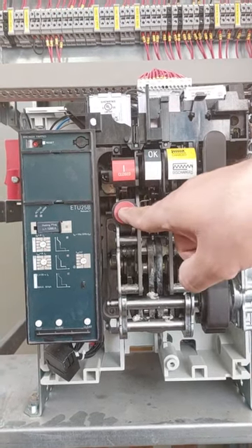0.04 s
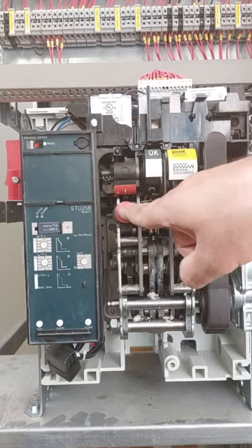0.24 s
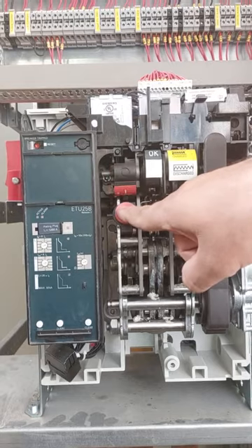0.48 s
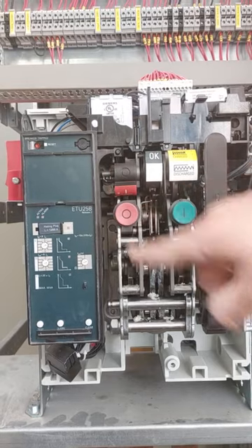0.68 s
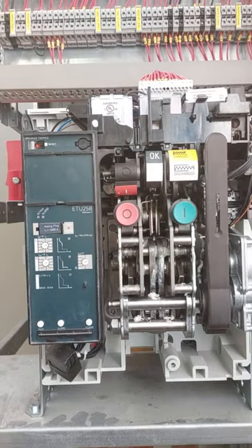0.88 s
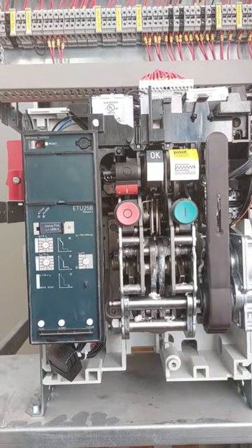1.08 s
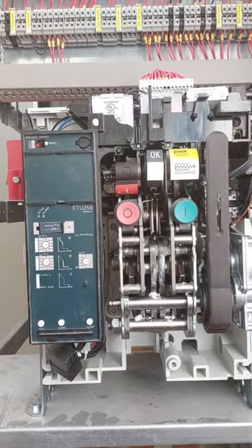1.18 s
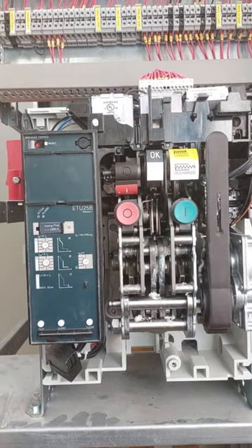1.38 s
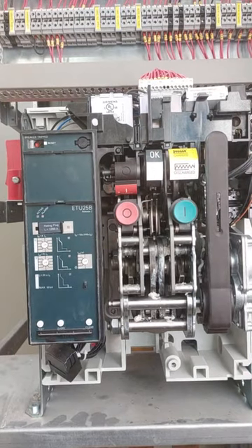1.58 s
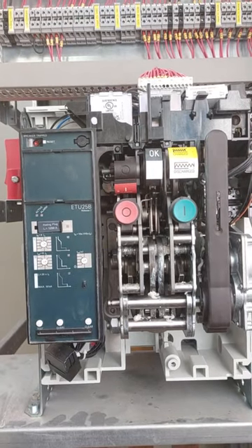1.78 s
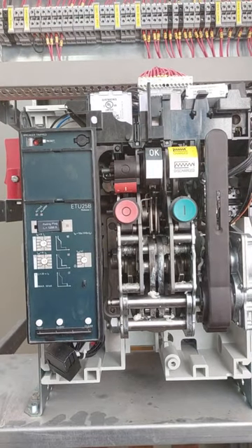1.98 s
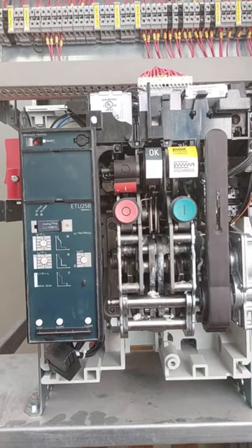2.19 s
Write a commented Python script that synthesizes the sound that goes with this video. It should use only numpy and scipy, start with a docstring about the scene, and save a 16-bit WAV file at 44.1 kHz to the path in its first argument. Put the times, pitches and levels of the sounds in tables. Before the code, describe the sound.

Loud steel breaker slam with booming room echo and small rattles, over low transformer hum.

```python
"""A hard-walled plant room: a large circuit breaker trips inside a steel panel.
Transformers hum as overtones in step, with loose tones and a thin whine; fans are coloured noise.
The latch scrapes free as rough noise, then quick blows knock the linkage (decaying modes) and crack (noise).
The panel rings in beating pairs over a low jolt, the room booms back, and loose parts rattle after.
After the bang the level of everything sinks and slowly returns."""
import sys
import numpy as np
from scipy import signal
from scipy.fft import rfft, irfft, next_fast_len
from scipy.io import wavfile
from scipy.ndimage import map_coordinates

SR = 44100
rng = np.random.default_rng(int(sys.argv[2]) if len(sys.argv) > 2 else 0)


def unload_audio(sound):
    """Save the sound as a 16-bit wav file, at the path given as the first command line argument."""
    columns = np.transpose(np.atleast_2d(sound))
    # keep every value between -1 and 1, then stretch to whole-number steps
    steps = np.round(np.clip(columns, -1, 1) * 32767)
    wavfile.write(sys.argv[1], SR, steps.astype(np.int16))


N = 99225  # samples, 2.25 s


def amp(db):
    """Gain of a level in dB."""
    return 10 ** (np.asarray(db) / 20)


def unit(x):
    """Scale a signal to rms 1."""
    return x / np.sqrt(np.mean(x ** 2) + 1e-20)


def along(points, hz):
    """Read (pitch_hz, value) points on a log pitch axis."""
    point_hz, values = np.transpose(points)
    return np.interp(np.log(hz + 1), np.log(point_hz + 1), values)


def curve(rows):
    """Join (time_s, value) points into one value per sample."""
    return np.interp(np.arange(N) / SR, *np.transpose(rows))


def wobble(rate):
    """A smooth random curve with this many knots a second."""
    knots = rng.standard_normal(int(N * rate / SR) + 4)
    return map_coordinates(knots, [np.arange(N) * rate / SR])


def filtered(x, response):
    """Shape a sound by a gain that depends on frequency."""
    size = next_fast_len(x.shape[-1] + SR // 2)  # padded so the end does not wrap round
    spectrum = rfft(x, size) * response(np.fft.rfftfreq(size, 1 / SR))
    return irfft(spectrum, size)[..., :x.shape[-1]]


def rush(size, spectrum, alike):
    """Coloured stereo noise of rms 1; the mid-side balance sets how alike left and right are."""
    def mid_side_gain(hz):
        angle = np.arccos(np.clip(along(alike, hz), -1, 1)) / 2
        return amp(along(spectrum, hz)) * [np.cos(angle), np.sin(angle)]

    mid, side = filtered(rng.standard_normal((2, size)), mid_side_gain)
    return unit(np.array([mid + side, mid - side]))


def add(track, s, burst):
    """Mix a burst in at s seconds."""
    start = round(s * SR)
    track[..., start:start + burst.shape[-1]] += burst


TONE_WAVER_DB = 1.22
CHANNEL_PHASE_RAD = 0.69  # phase between left and right: half this each way, per decade above 40 Hz


def tone(cycles, hz, db):
    """A steady tone whose level wavers, with its own phase in each channel."""
    side = rng.choice([-.5, .5]) * np.array([[1], [-1]])
    lead = CHANNEL_PHASE_RAD * 2 * side / 2 * np.log10(hz / 40)
    return np.sqrt(2) * amp(db + TONE_WAVER_DB * wobble(7)) * np.cos(2 * np.pi * cycles + lead)


HUM_HZ, HUM_DB = 99.68, -47.5  # twice the mains; base level of the overtones
PULSE_S, TREBLE_LAG_S_PER_KHZ = 1.9115, .0012  # when one pulse falls, and how much later its treble comes
PULSE_SPREAD = .08  # cycles by which the overtones miss a common pulse
WHINE_HZ = 2660
# Overtones of the transformer hum: multiple [of HUM_HZ], level_db [over HUM_DB]
HUM_OVERTONES = [(1, -6), (2, -8.5), (3, -8.5), (4, -6.5), (5, -13), (6, -14), (7, -19), (8, -9.5),
                 (9, -13), (10, -13.5), (11, -30.5), (12, -15.5), (13, -33), (14, -30.5), (15, -26),
                 (16, -17.5), (17, -14.5), (18, -23), (19, -17), (20, -17.5)]
# Other steady tones: pitch_hz, level_db
LOOSE_TONES = [(91.5, -52.5), (233, -51.5), (2073, -65), (2191, -73), (2369, -80), (2713, -71), (2875, -82)]
# The thin whine as it fades: time_s, level_db
WHINE_LEVEL = [(0, -64), (.2, -63.5), (1.2, -67), (2.25, -68)]


def hum():
    """Transformer overtones in step make one downward pulse a cycle; loose tones and a whine join in."""
    t = np.arange(N) / SR
    buzz = 0
    for multiple, db in HUM_OVERTONES:
        hz = multiple * HUM_HZ
        pulse_s = PULSE_S + TREBLE_LAG_S_PER_KHZ * hz / 2000  # phase delay: half the treble's lag
        buzz = buzz + tone(hz * (t - pulse_s) + rng.normal(0, PULSE_SPREAD), hz, HUM_DB + db)
    steady = LOOSE_TONES + [(WHINE_HZ, curve(WHINE_LEVEL))]
    return sum(tone(hz * t + rng.random(), hz, db) for hz, db in steady) - buzz


RUMBLE_DB, RUMBLE_WAVER_DB, HISS_WAVER_DB = -43, 1.6, 0.74
# Colour of the fan rumble: pitch_hz, level_db [per Hz, relative]
RUMBLE_COLOUR = [(15, -50), (30, -23), (50, -4), (87, 2.5), (160, -1.5), (284, -7), (342, -14),
                 (394, -10.5), (547, -17.5), (790, -20), (1070, -23), (1940, -21.5), (2300, -26),
                 (2850, -29.5), (3050, -39), (4290, -73.5), (7260, -120)]
# Colour of the air hiss: pitch_hz, level_db [per Hz, relative]
HISS_COLOUR = [(1760, -33), (3000, -2.5), (5000, -6), (5880, -14), (8460, -14), (10900, -17), (12000, -9.5),
               (13600, -19), (15100, -14.5), (16000, -24)]
# Level of the hiss over time: time_s, level_db
HISS_LEVEL = [(0, -75), (.2, -75), (.9, -82), (1.4, -80), (1.8, -79), (1.9, -76), (1.96, -71), (2.06, -73),
              (2.25, -74)]
# Stereo image of rumble and hiss: pitch_hz, likeness [left-right correlation, -1 to 1]
FAN_LIKENESS = [(60, 0.93), (180, 1), (550, 0.71), (1650, -0.068), (4970, -0.04), (15000, 0.01)]


def fans():
    """Moving air as two bands of noise: an uneven rumble and a faint hiss."""
    rumble = amp(RUMBLE_DB + RUMBLE_WAVER_DB * wobble(9)) * rush(N, RUMBLE_COLOUR, FAN_LIKENESS)
    hiss_gain = amp(curve(HISS_LEVEL) + HISS_WAVER_DB * wobble(12))
    return rumble + hiss_gain * rush(N, HISS_COLOUR, FAN_LIKENESS)


LATCH_S, LATCH_DB, LATCH_GROWS_DB = .2043, -39, 5  # scrapes until the first blow
CRACK_T60_S, BLOW_RISE_S = .014, .0003
KNOCK_LAG_S = .0001  # the left channel hears the knock later
# Blows of the linkage: start_s, knock_db, crack_db
BLOWS = [(.2098, -26, -9), (.2117, -9, -19), (.2139, -11, -20), (.2154, -15, -21), (.2210, -13, -21),
         (.2270, -19, -21), (.2290, -19, -22), (.2325, -19, -23), (.2385, -21, -26), (.2545, -19, -32)]
# Ringing modes of the linkage: pitch_hz, level_db [over knock_db], t60_s
KNOCK_MODES = [(436, -10, 0.018), (764, -2, .022), (1008, -6, 0.022), (1270, -2.5, .02), (1754, -3, .014),
               (2400, -1.5, .012), (3000, -0.5, .012), (3700, -7, .01)]
# Colour of the steel crack: pitch_hz, level_db [per Hz, relative]
CRACK_COLOUR = [(1500, -38.5), (3000, -7.5), (5000, -6.5), (6500, -12), (9000, -7.5), (11000, -8),
                (13500, -2), (16000, -7.5)]
# Stereo lean of the trip: pitch_hz, pan_db [left over right]
BLOW_PAN = [(100, 2), (1000, -3), (3000, -4.5), (7000, 1), (13000, -7.5)]


def latch():
    """Steel slips on steel: treble-heavy noise that grows until the first blow."""
    t = np.arange(int((BLOWS[0][0] - LATCH_S) * SR)) / SR
    scrape = np.diff(rng.standard_normal((2, len(t) + 1)))  # differencing tilts it to treble
    return amp(LATCH_DB + LATCH_GROWS_DB * t / t[-1]) * scrape


def knock(t):
    """The struck linkage rings briefly in several modes, each with a slightly scattered phase."""
    heard_t = t + KNOCK_LAG_S * np.array([[-.5], [.5]])
    ring = np.zeros((2, len(t)))
    for hz, db, t60 in KNOCK_MODES:
        cycles = hz * heard_t + rng.normal(0, 0.044, (2, 1))
        ring += amp(db - 60 * t / t60) * np.sin(2 * np.pi * cycles)
    return ring


def trip():
    """The latch scrapes, then steel slams on steel: each blow is a knock under a bright crack."""
    out, t = np.zeros((2, N)), np.arange(SR // 20) / SR
    add(out, LATCH_S, latch())
    for s, knock_db, crack_db in BLOWS:
        crack = amp(crack_db - 60 * t / CRACK_T60_S) * rush(len(t), CRACK_COLOUR, [(3000, .1)])
        attack = 1 - np.exp(-t / BLOW_RISE_S)
        add(out, s, attack * (crack - amp(knock_db) * knock(t)))
    return filtered(out, lambda hz: amp(np.outer([.5, -.5], along(BLOW_PAN, hz))))


ROOM_RISE_S = .006
# Reverberation of the hard walls: pitch_hz, t60_s
ROOM_T60 = [(60, 1.2), (150, 7.4), (300, 2.02), (700, 1.99), (1500, 1.455), (3000, 0.9), (5000, 0.77),
            (8000, 0.46), (12000, 0.26), (15500, 0.21)]
# Stereo image of the reverberation: pitch_hz, likeness [left-right correlation]
ROOM_LIKENESS = [(60, 0.27), (150, .6), (300, .75), (600, .65), (1200, .15), (8000, .05)]


def tail(colour):
    """The room's answer: noise in which each frequency dies at its own speed."""
    hz, t, bands = signal.stft(rush(2 * SR, colour, ROOM_LIKENESS), SR, nperseg=512)
    decay = amp(-60 * t / along(ROOM_T60, hz)[:, None])
    x = signal.istft(bands * decay, SR, nperseg=512)[1]
    return x * (1 - np.exp(-np.arange(x.shape[1]) / SR / ROOM_RISE_S))


ROOM_DB = -18.5
# Colour of the bang as the room returns it: pitch_hz, level_db [per Hz, relative]
ROOM_COLOUR = [(35, -47), (60, -22), (248, -9), (327, -1.5), (385, -4), (486, -13), (599, -12), (705, -6.5),
               (792, -13), (1420, -10), (2360, -9.5), (2840, -12), (5200, -15), (6500, -18), (8670, -21.5),
               (12000, -15.5), (14500, -21.5), (16000, -27)]


def room_boom():
    """The walls return the bang from the first blow on, leaning less to one side than the blows do."""
    out = np.zeros((2, 2 * N))
    panned = filtered(tail(ROOM_COLOUR), lambda hz: amp(np.outer([.3, -.3], along(BLOW_PAN, hz))))
    add(out, BLOWS[0][0], amp(ROOM_DB) * panned)
    return out[:, :N]


THUMP_S, THUMP_HZ, THUMP_DB = .211, 54.7, -21
THUMP_T60_S, THUMP_RISE_S = .14, .02
PANEL_DB, PANEL_RISE_CYCLES = -27.5, 8  # base level; time constant of the build-up
# Sheet steel modes of the panel: pitch_hz, level_db [over PANEL_DB, each of a pair], t60_s
PANEL_MODES = [(188.6, -14, .9), (237.6, -10.5, 1.2), (307, -4.5, 1.2), (366, -6.5, 0.36), (395, -7, 0.97),
               (417, -10.5, 0.93), (681.7, -2.5, 0.69), (720, -5.5, 0.17), (921, -6.5, 0.93), (973, -3, .5),
               (1163, -9.5, .4), (1276, -5, .3), (1468, -15.5, .5), (1699, -12, .5), (2075, -6.5, 0.9)]


def cabinet():
    """The panel's sheets ring as close, beating pairs, and the whole frame gives one low jolt."""
    out, t = np.zeros((2, 2 * N)), np.arange(N) / SR
    for hz, db, t60 in PANEL_MODES:
        pair = 0
        for detune in (-.006, .007):
            cycles = hz * (1 + detune) * t + rng.normal(0, .08, (2, 1))
            pair = pair + np.sin(2 * np.pi * cycles)
        build_up = 1 - np.exp(-t * hz / PANEL_RISE_CYCLES)
        add(out, BLOWS[1][0], amp(PANEL_DB + db - 60 * t / t60) * build_up * pair)
    thump = amp(THUMP_DB - 60 * t / THUMP_T60_S) * np.sin(2 * np.pi * THUMP_HZ * t)
    add(out, THUMP_S, (1 - np.exp(-t / THUMP_RISE_S)) * thump)
    return out[:, :N]


SKIRT_DB, SKIRT_WIDTH = -6, .5  # broad part: gain before scaling by hump width; width over centre
RATTLE_RISE_CYCLES = 6  # time constant of the attack
# Ticks of loose parts: start_s, level_db [before the decay shape], centre_hz,
# width [over centre], t60_s, pan_db [left over right]
RATTLES = [(0.4138, -53.5, 12100, 0.18, 0.061, -2.5), (0.429, -60, 12000, .3, .1, -5),
           (.4870, -63.5, 11000, .3, 0.036, -2), (0.5433, -58.5, 11800, 0.33, .1, -6),
           (0.5866, -44.5, 11930, 0.081, 0.033, -1), (.5866, -54, 15300, .06, .025, -1),
           (0.617, -56.5, 7650, 0.099, 0.026, 20), (.6185, -62, 13500, .15, .04, -1),
           (.6180, -40.5, 3800, 0.17, 0.052, 2.5), (.6230, -47, 4550, 0.029, .12, -2),
           (0.6726, -53.5, 11700, 0.34, 0.091, -4.5), (.6730, -51, 4350, 0.35, 0.23, -3),
           (.6780, -42.5, 800, 0.35, 0.27, -3), (.6760, -38.5, 1850, 0.24, .2, -8.5),
           (.6720, -31, 240, .25, .35, 0.5), (.8550, -70, 7000, .3, .04, 4),
           (1.046, -55, 2000, 0.38, 0.49, -1), (1.050, -66, 4000, .2, .3, 0)]


def rattles():
    """Loose parts tick: dense ringing around one pitch on a broad skirt."""
    out, t = np.zeros((2, N)), np.arange(SR // 3) / SR
    for s, db, centre_hz, width, t60, pan_db in RATTLES:
        def hump(hz):
            off = np.log((hz + 1) / centre_hz)
            skirt = amp(SKIRT_DB) * np.sqrt(width / SKIRT_WIDTH) * np.exp(-(off / SKIRT_WIDTH) ** 2)
            return np.exp(-(off / width) ** 2) + skirt

        noise = unit(filtered(rush(len(t), [(100, 0)], [(100, 0.55)]), hump))
        decay = amp(-60 * t / t60) + 1.2 * amp(-240 * t / t60)  # a ring, and a tick four times as fast
        attack = 1 - np.exp(-t * centre_hz / RATTLE_RISE_CYCLES)
        pan = np.array([[pan_db], [-pan_db]]) / 2
        add(out, s, amp(db + pan) * decay * attack * noise)
    return out


RATTLE_ROOM_DB = -3.5


def room_rattles(ticks):
    """The room answers the rattles: convolution with an uncoloured tail of unit energy on the left."""
    plain = tail([(100, 0)])
    echo = signal.fftconvolve(ticks, plain / np.linalg.norm(plain[0]), axes=1)[:, :N]
    return amp(RATTLE_ROOM_DB) * echo


LEAN_DB = 2  # background louder on the right


def scene():
    """Background, breaker, room and rattles together."""
    background = amp([[-LEAN_DB / 2], [LEAN_DB / 2]]) * (hum() + fans())
    ticks = rattles()
    return background + trip() + room_boom() + cabinet() + ticks + room_rattles(ticks)


SELF_NOISE_DB = -89
TOP_HZ, TOP_EDGE_HZ = 15850, 60  # band limit and the softness of its edge
# Level of everything but the self noise: time_s, level_db
LEVEL = [(0, 0.5), (.25, 1.13), (.6, -4), (.94, -12.5), (1.35, -18.5), (1.64, -11.5), (1.97, -4),
         (2.25, -2)]


def record(dry):
    """The level sinks and returns, faint self noise joins, and the band limit cuts the top."""
    x = dry * amp(curve(LEVEL)) + amp(SELF_NOISE_DB) * rng.standard_normal(dry.shape)
    return filtered(x, lambda hz: 1 / (1 + np.exp(np.clip((hz - TOP_HZ) / TOP_EDGE_HZ, -50, 50))))


dry = scene()
out = record(dry)
unload_audio(out)
```